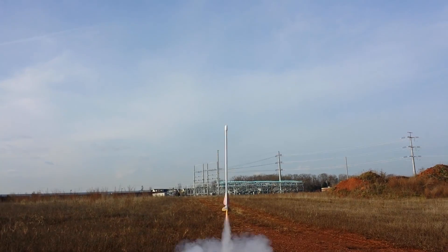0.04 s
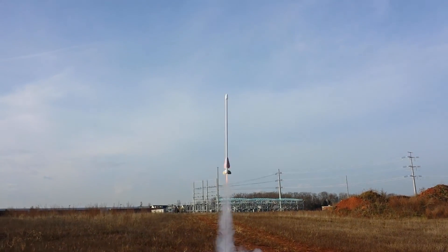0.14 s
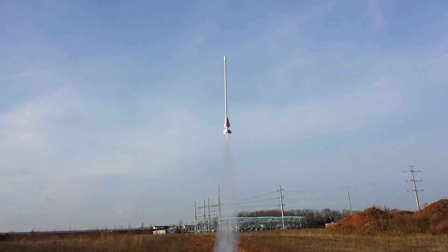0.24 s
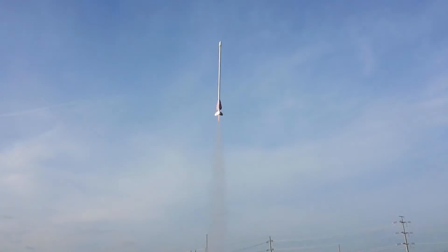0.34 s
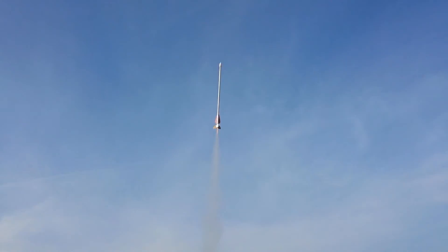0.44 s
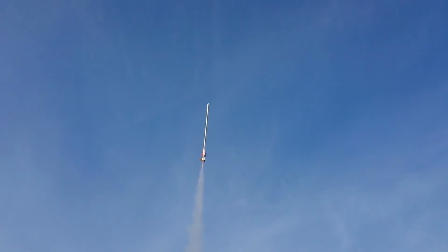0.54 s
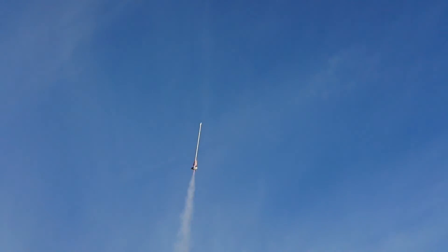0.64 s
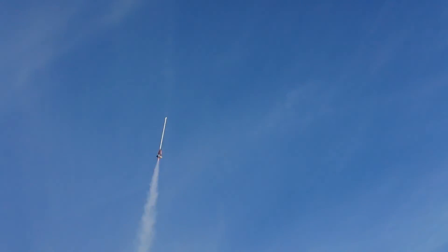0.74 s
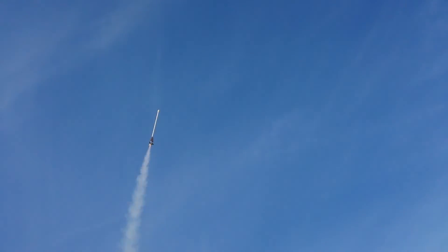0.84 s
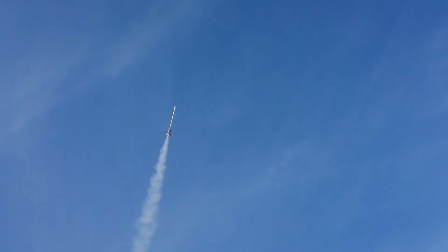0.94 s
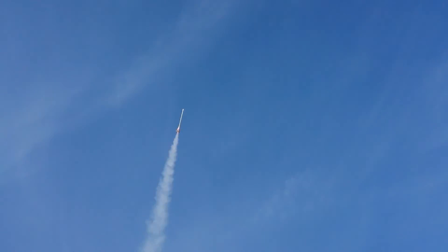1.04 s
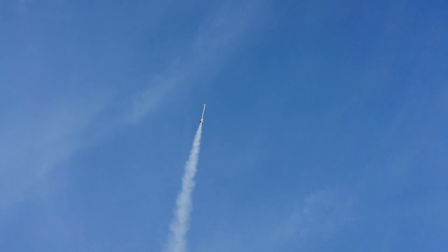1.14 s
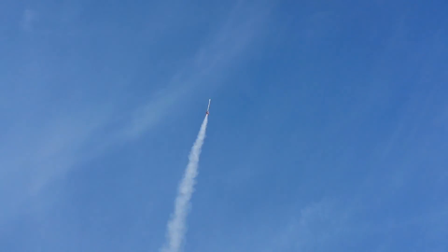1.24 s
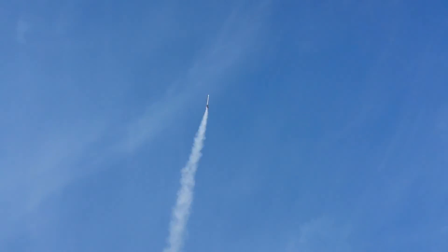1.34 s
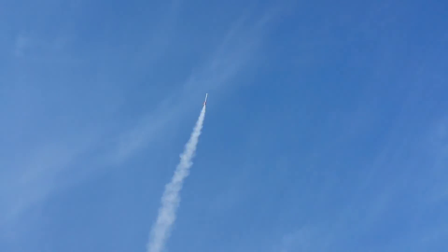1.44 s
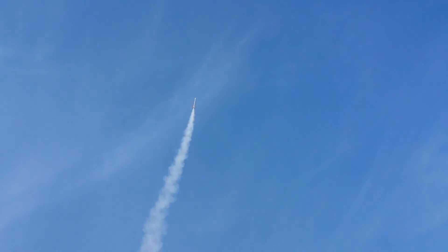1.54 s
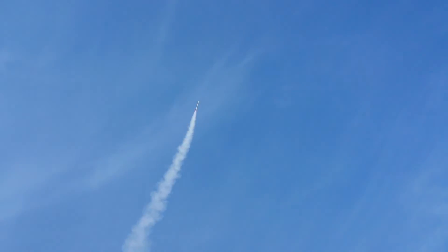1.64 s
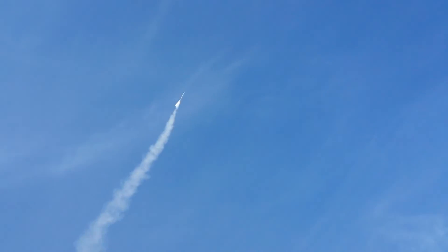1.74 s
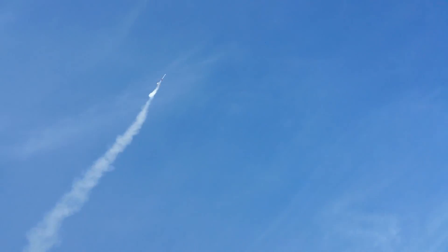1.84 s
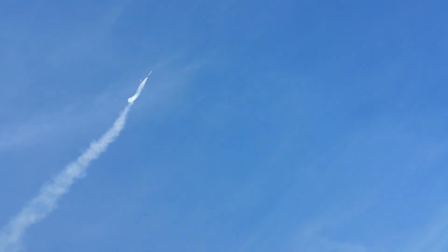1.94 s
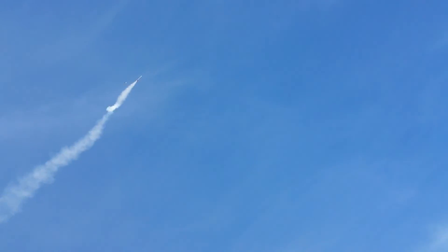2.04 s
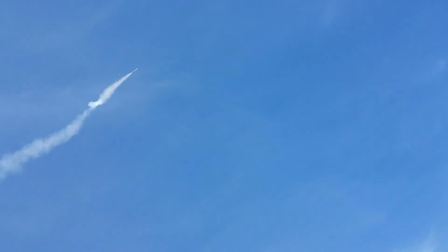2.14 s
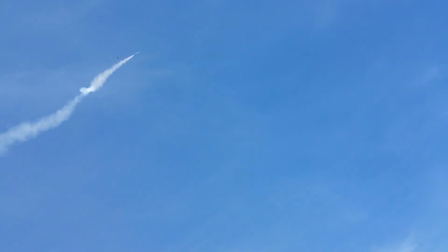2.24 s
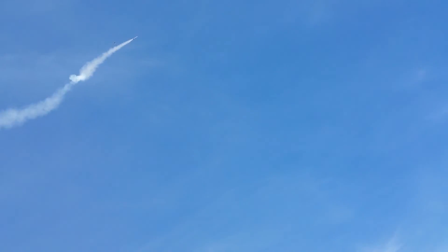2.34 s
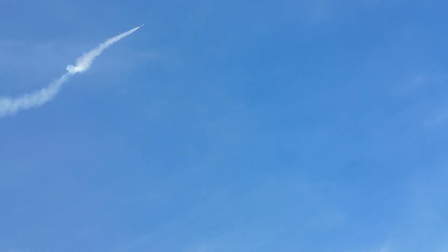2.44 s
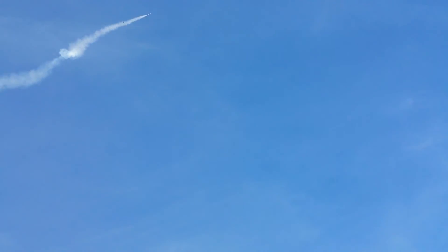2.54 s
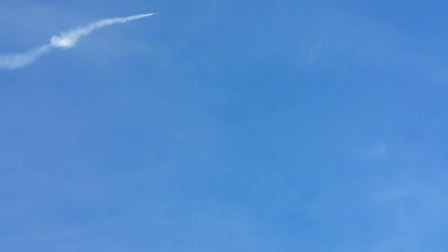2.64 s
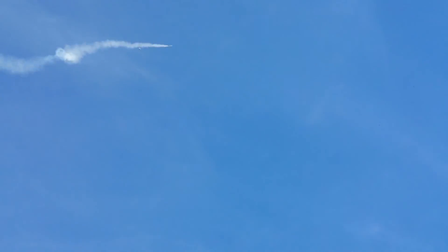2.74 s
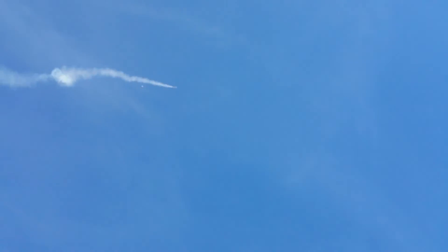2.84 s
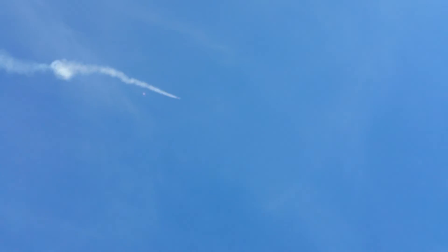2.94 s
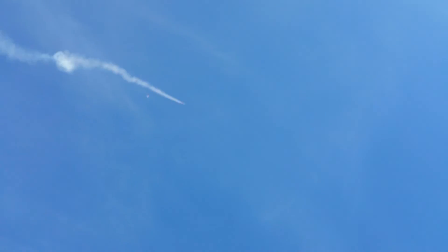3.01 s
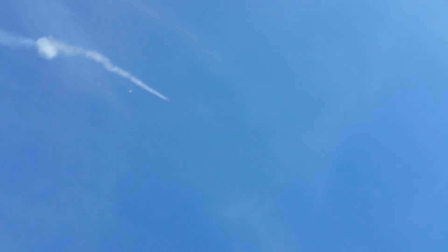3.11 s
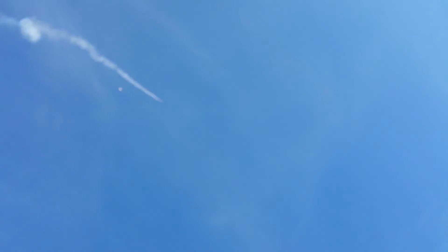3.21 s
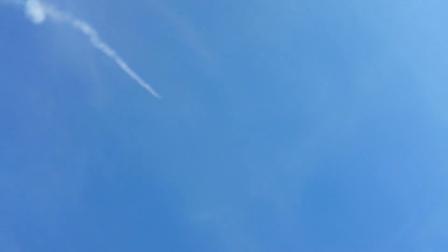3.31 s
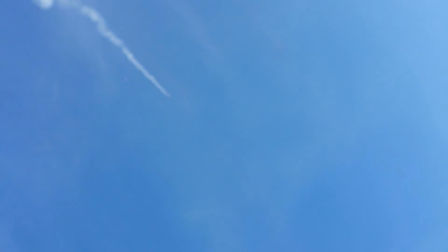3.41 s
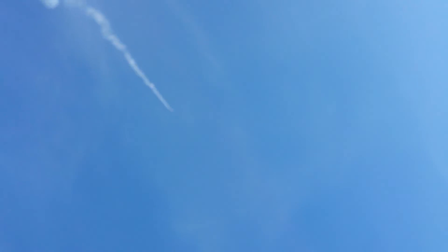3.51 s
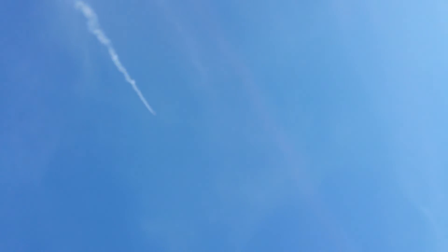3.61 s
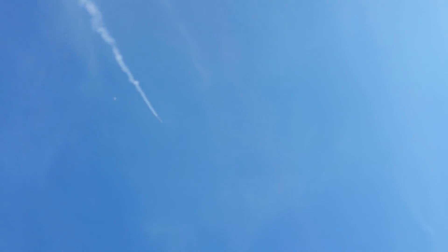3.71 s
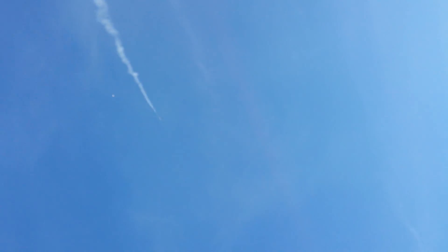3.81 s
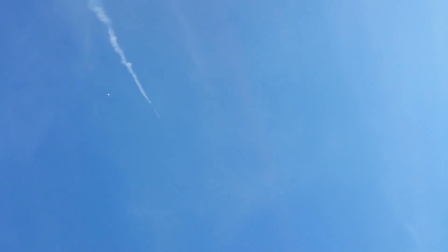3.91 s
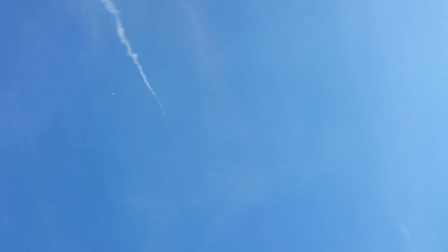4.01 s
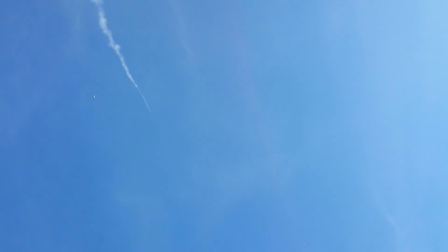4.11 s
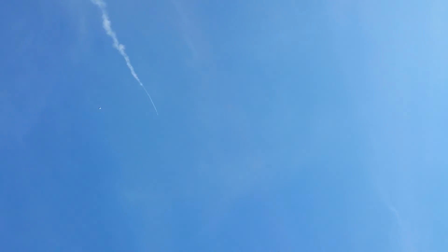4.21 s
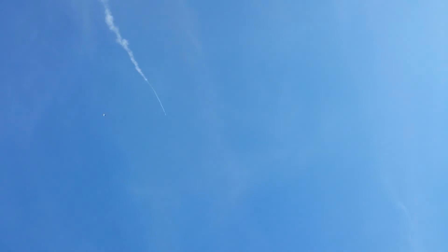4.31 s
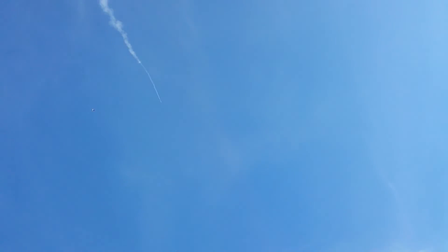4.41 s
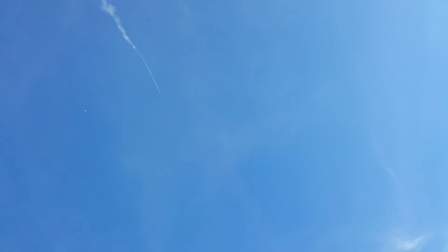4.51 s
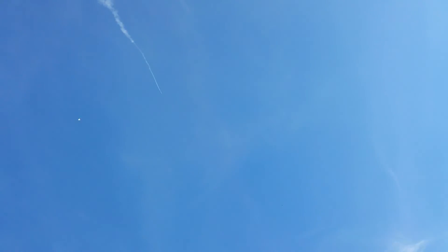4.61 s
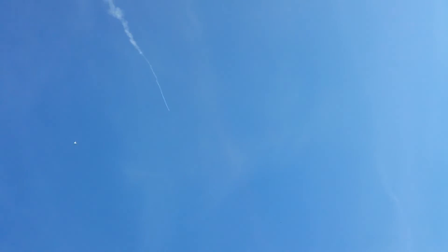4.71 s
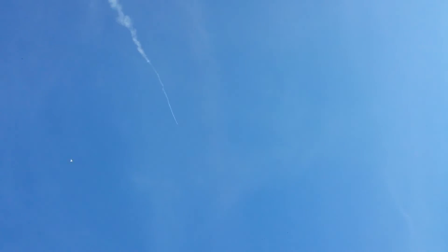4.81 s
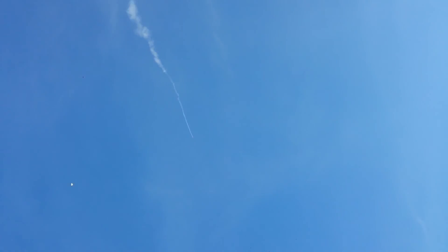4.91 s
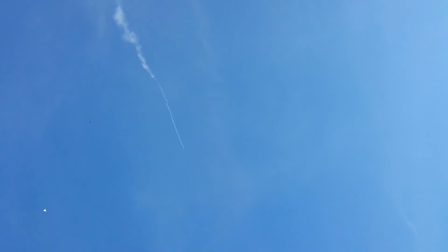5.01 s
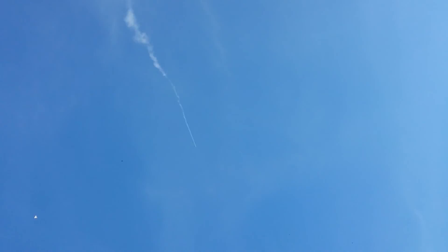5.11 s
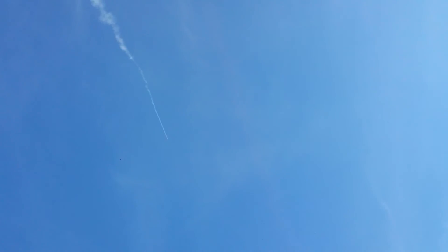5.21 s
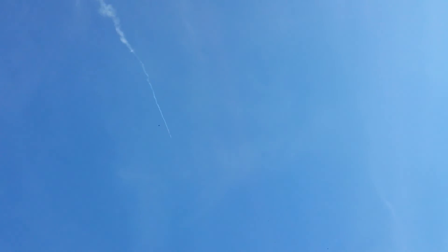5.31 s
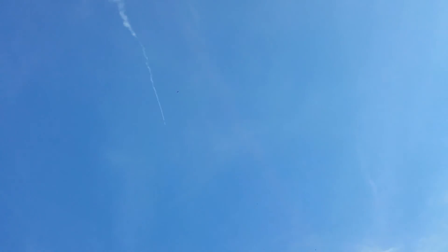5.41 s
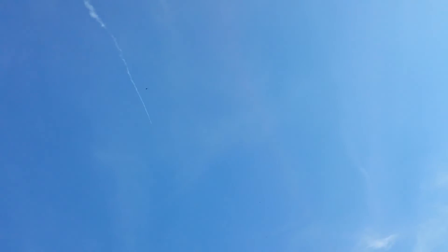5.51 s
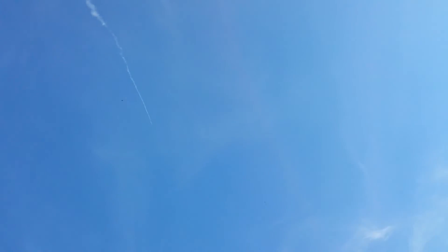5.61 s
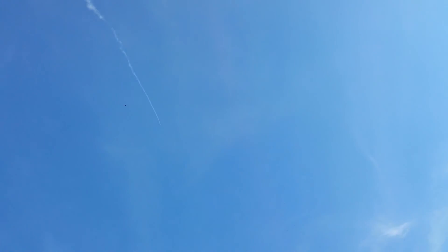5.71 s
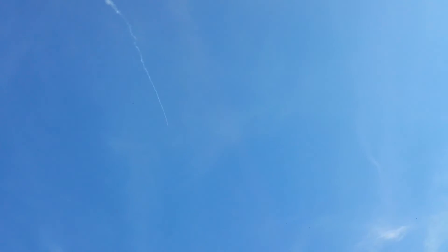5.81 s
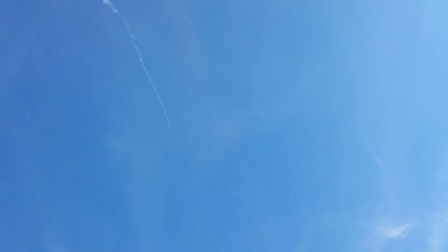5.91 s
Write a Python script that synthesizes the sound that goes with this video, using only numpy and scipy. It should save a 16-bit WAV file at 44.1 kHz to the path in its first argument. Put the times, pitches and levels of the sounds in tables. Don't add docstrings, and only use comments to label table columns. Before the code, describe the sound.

A small rocket motor ignites with a blast and loud bright hiss, cuts out briefly, then a second hiss burns and ends in faint rumble.

```python
import sys
import numpy as np
from scipy import signal
from scipy.io import wavfile
from scipy.ndimage import uniform_filter1d

SR = 44100
rng = np.random.default_rng(int(sys.argv[2]) if len(sys.argv) > 2 else 0)


def volts(x):
    e = np.asarray(x, float) / 20
    return 10 ** e


def wrap_up_sound(samples):
    columns = np.atleast_2d(samples).T
    tamed = np.clip(columns, -1, 1)
    steps = np.round(tamed * 32767).astype(np.int16)
    wavfile.write(sys.argv[1], SR, steps)


N = 262501


def evened(x):
    return x / np.sqrt(np.mean(x ** 2) + 1e-20)


def read(points, hz):
    f, value = np.transpose(points)
    return np.interp(np.log(hz + 1), np.log(f + 1), value)


def spectra(size):
    return signal.stft(rng.standard_normal((2, N)), SR, nperseg=size, noverlap=size * 3 // 4)


def pair(z, hz, same, lag_us):
    same = np.clip(same, 0, 1)[:, None]
    left = z[0] * np.exp(-2j * np.pi * hz[:, None] * lag_us / 10 ** 6)
    right = same * z[0] + np.sqrt(1 - same ** 2) * z[1]
    return np.array([left, right])


def patches(shape, bins, frames):
    x = uniform_filter1d(rng.standard_normal(shape), bins, 0)
    x = uniform_filter1d(uniform_filter1d(x, frames, 1), frames, 1)
    return evened(x)


def ring(hz, centre_hz, width, db, lag):
    resonance = 1 / (1 + 2j * (hz - centre_hz) / width) ** 2
    return 1 + (volts(db) - 1) * np.exp(-1j * lag) * resonance


def pop(hz, cycles):
    u = np.arange(0, 2.5 * cycles / hz, 1 / SR) * hz / cycles
    return -np.sin(2 * np.pi * cycles * u) * 5 * u * np.exp(-2.6 * u)


def pops(rows, left_db):
    out = np.zeros(N)
    for s, db, hz, cycles in rows:
        wavelet = volts(db) * pop(hz, cycles)
        out[round(s * SR):][:len(wavelet)] += wavelet
    return out * volts(np.array([[left_db], [-left_db]]))


# f/Hz, level/dB per Hz
FIELD_SPECTRUM = [(12, -67), (20, -33.5), (43, -7), (92, -1.5), (263, -10), (294, -13), (421, -21),
                  (713, -14.5), (1270, -15), (1550, -18.5), (3010, -33.5), (6530, -35), (11400, -45.5),
                  (13800, -45.5), (15000, -53.5)]
# f/Hz, coherence/1
FIELD_COHERENCE = [(30, .75), (150, 1), (500, 0.39), (1500, 0.67), (3000, 0.396), (6000, 0.19),
                   (15000, 0.018)]
# t/s, level/dB
FIELD_GAIN = [(.2, -53.5), (.7, -51.5), (1.06, -61.5), (2.0, -59), (4.2, -40), (4.45, -41), (5.95, -41)]


def field():
    lag_us, whine_hz = -415, 14002
    hz, t, z = spectra(size=2048)
    db = read(FIELD_SPECTRUM, hz)[:, None] + 1.9 * patches(z[0].shape, bins=5, frames=5)
    z = pair(z, hz, read(FIELD_COHERENCE, hz), lag_us) * volts(db)
    z[0] *= volts(.6) * ring(hz[:, None], 6400, 1800, 2.0, lag=.6)
    z *= ring(hz[:, None], 296, 50, 3.0, lag=0)
    out = evened(signal.istft(z, SR, nperseg=2048, noverlap=1536)[1][:, :N])
    time = np.arange(N) / SR
    fade_in = np.clip((time - 4.1) / .3, 0, 1)
    out[1] += volts(-25) * fade_in * np.sin(2 * np.pi * whine_hz * time)
    return out * volts(np.interp(time, *np.transpose(FIELD_GAIN)) + 4.0)


# t/s, length/s, level/dB, low f/Hz, high f/Hz
RUSHES = [
    (.03, .115, -26.5, 120, 790),
    (5.275, .055, -41, 685, 1570),
    (5.27, 0.066, -54, 2500, 9000),
]


def rushes():
    out = np.zeros((2, N))
    for s, length, db, low_hz, high_hz in RUSHES:
        a, b, lumps = rng.standard_normal((3, SR // 4))[:, :round(length * SR)]
        band = signal.butter(2, [low_hz, high_hz], "band", fs=SR)
        noise = signal.lfilter(*band, [a, .6 * a + .8 * b])
        grain = volts(1.5 * evened(uniform_filter1d(lumps, 150)))
        rush = volts(db) * evened(noise * grain) * signal.windows.tukey(len(a), .4)
        out[:, round(s * SR):][:, :len(a)] += rush
    return out


# t/s, peak level/dB, f/Hz, cycles/1
HANDLING = [
    (3.9325, -8.5, 1250, 1.4),
    (4.073, -20.5, 1430, 1.3),
    (4.183, -25, 1210, 1.1),
    (5.291, -28.5, 743, 4),
]


def handling():
    return pops(HANDLING, 0.63)


def height(t):
    return 1.02 * t + .46 * t ** 3


USUAL_ROAR_DB, USUAL_FIZZ_DB = -10, -1
FLARE_S = .12
# t/s, jet level/dB
THRUST_CURVES = [
    [(0, -33.5), (.048, -20.5), (.104, -18.5), (.27, -24.5), (.5, -22.5), (.83, -22.5), (.96, -24.5),
     (1.38, -25.5), (1.785, -28)],
    [(1.95, -56.5), (1.99, -41.5), (2.04, -27.5), (2.14, -27.5), (2.4, -30.5), (3.26, -31), (3.57, -27),
     (3.73, -27.5), (3.93, -24.5)],
]
# cut-off/(dB/s), echo below last level/dB, echo decay/(dB/s), fizz/dB, echo fizz loss/(dB/s)
MOTOR_ENDINGS = [
    (520, -16, 123, 4, -61.5),
    (210, -19.5, 27.5, 5, 2),
]
# t/s, half length/s, level/dB, low roar/dB
JET_SWELLS = [(0, .02, -6, 25), (0.258, .1, -2.5, 5), (0.876, .04, 0.5, -3.5), (1.28, .04, -1, 2.5),
              (1.574, .22, -.5, 3.5), (1.794, .015, -0.5, 10), (2.109, 0.045, 0, 5.5),
              (2.17, 0.043, 0.5, 6.5), (2.833, .02, 3, 0.5), (3.225, .03, 0, 3.5), (3.565, .06, 1, -3),
              (3.866, .02, 1, -0.5), (3.975, .03, -0.5, 8.5), (4.36, .1, -3, 4), (1.92, .04, 1, 6),
              (4.455, 0.054, 3.5, -6), (1.387, .04, -0.5, 4.5), (3.085, .04, 2, -1.5), (3.671, .04, 1, 0),
              (2.352, .08, 1.5, -1.5)]


def burn(t):
    power, fizz = 0, 0
    for curve, (cut, echo_db, decay, motor_fizz_db, dulling) in zip(THRUST_CURVES, MOTOR_ENDINGS):
        s, db = np.transpose(curve)
        after = np.maximum(t - s[-1], 0)
        now_db = np.interp(t, s, db, left=-150)
        direct = volts(2 * (now_db - cut * after))
        echo = (after > 0) * volts(2 * (now_db + echo_db - decay * after))
        part = direct + echo
        power = power + part
        fizz = fizz + part * (motor_fizz_db - dulling * after)
    s, half, swell_db, roar_db = np.transpose(JET_SWELLS)[:, :, None]
    bump = np.exp(-((t - s) / half) ** 2)
    level_db = 10 * np.log10(power) + (swell_db * bump).sum(0)
    far_db = 7 * np.log10(np.hypot(1, height(t)))
    fizz_db = fizz / power - far_db + 11.5 * np.exp(-t / FLARE_S)
    return level_db, USUAL_ROAR_DB + (roar_db * bump).sum(0), fizz_db


# t/s, peak level/dB, cycles/1
BLAST_SLAMS = [
    [(.0695, -8, .6), (.103, -13, .5), (.1172, -7, .6)],
    [(.0678, -10, .55), (.0855, -12.5, .6), (.1172, -15.5, .5)],
]


def slams():
    rows = [[(s, db, 170, cycles) for s, db, cycles in port] for port in BLAST_SLAMS]
    return np.array([-pops(port, 0)[0] for port in rows])


def crackle():
    level_db, roar_db = burn(np.arange(N) / SR)[:2]
    drive = volts(level_db + roar_db - 6.5)
    strength = volts(3.3 * np.minimum(rng.exponential(1, N), 4))
    size = strength * (rng.random(N) < 150 / SR) * drive
    kind = rng.integers(0, 4, N)
    out = np.zeros(N)
    for k in range(4):
        out += signal.oaconvolve(size * (kind == k), pop(450 * 1.58 ** k, 1.0))[:N]
    return out * volts(np.array([[1.], [-1.]]))


# t/s, peak level/dB
MOTOR_SPITS = [(0.789, -16.5), (0.804, -20), (0.975, -22.5), (1.101, -26.5), (1.259, -32), (1.4, -23),
               (1.673, -23.5), (1.708, -20.5), (1.783, -34), (1.799, -25), (2.711, -32), (2.84, -30),
               (3.075, -25.5), (3.318, -28), (3.595, -18)]
# t/s, peak level/dB, f/Hz, cycles/1
PITCHED_SPIT = [
    (1.363, -16.5, 640, .7),
]


def spits():
    small = [(s, db, 523, .6) for s, db in MOTOR_SPITS]
    pulses = crackle() + pops(small + list(PITCHED_SPIT), 0.4)
    return signal.lfilter(*signal.butter(2, 90, "high", fs=SR), pulses)


# f/Hz, level/dB
JET_SPECTRUM = [(60, -37.5), (300, -25.5), (700, -13), (1400, -9), (2300, -2.5), (4000, 2), (5500, 1.5),
                (7000, 2), (8400, 4.5), (10000, -1), (12000, -9), (14000, -18.5), (15400, -27)]
# f/Hz, coherence/1
JET_COHERENCE = [(100, .5), (800, .88), (2500, .9), (4500, .84), (7000, .78), (9200, .84), (12000, .78),
                 (15000, .6)]
# t/s, lag of left behind right/us, upper ring level/dB
CAMERA_AIM = [(0, -10, 2), (.1, -16.5, -13), (.2, 4, -1.5), (0.401, 9.5, 0.5), (.5, -7.5, 9),
              (.6, 26.5, 14), (.8, 58, 8), (1, 79.5, -3), (1.3, 7.5, -5), (1.4, 13.5, -11.5),
              (1.7, 31.5, -2), (2.0, 80.5, 4), (2.2, 98, 6), (2.7, 87, 6), (3.1, 45.5, -2), (3.2, 79, 6),
              (3.55, 56, 5.5), (3.75, 77.5, 3)]
# t/s, ring level/dB, f/Hz, phase lag/rad
PORT_CAVITY = [(0, 6.5, 6370, 0.13), (1.05, 12, 6410, 1.5), (2.1, 9.5, 6230, 0.11), (2.65, 12, 6870, 0.53),
               (4.2, 13, 6600, 0.55)]
# f/Hz, level/dB
LEFT_RESPONSE = [(300, -2.5), (1200, 2), (3000, 2), (5000, 0), (9000, -2.5), (13000, 0.5)]
# f/Hz, width/Hz, level/dB, phase lag/rad
BODY_RESONANCE = (1824, 1400, 4.72, 1.7)


def jet():
    hz, t, z = spectra(size=256)
    f = hz[:, None]
    level_db, roar_db, fizz_db = burn(t)
    turn, *aim = np.transpose(CAMERA_AIM)
    lag_us, upper_db = (np.interp(t, turn, c) for c in aim)
    tip, *cavity = np.transpose(PORT_CAVITY)
    ring_db, ring_hz, lag = (np.interp(t, tip, c) for c in cavity)
    ring_db = ring_db + 0.16 * upper_db + 16.5 * np.exp(-t / FLARE_S)
    fizz_db = fizz_db + 0.25 * upper_db

    low_share = 1 / (1 + (f / 2300) ** 5.0)
    high_share = np.minimum((f / 10500) ** 2.5, 1.6)
    db = read(JET_SPECTRUM, f) + level_db + 10.5
    db += low_share * (roar_db - USUAL_ROAR_DB) + high_share * (fizz_db - USUAL_FIZZ_DB)
    db += 0.96 * patches(db.shape, bins=7, frames=18)
    db += 0.69 * patches((1, len(t)), bins=1, frames=30)
    db += 0.88 * patches(db.shape, bins=40, frames=2)

    z = pair(z, hz, read(JET_COHERENCE, hz), lag_us) * volts(db)
    body_hz, body_width, body_db, body_lag = BODY_RESONANCE
    upper_hz = 8660 - 69 * upper_db
    z[0] *= ring(f, ring_hz, 1605, ring_db, lag) * volts(read(LEFT_RESPONSE, f))
    z[0] *= ring(f, upper_hz, 2400, upper_db, lag=0.1)
    z[0] *= ring(f, body_hz, body_width, body_db + 0.009 * lag_us, body_lag + 0.0059 * lag_us)
    return signal.istft(z, SR, nperseg=256, noverlap=192)[1][:, :N]


def ground(x):
    dull = signal.lfilter(*signal.butter(1, 3500, fs=SR), x)
    up = height(np.arange(N) / SR) + .025
    late = 11.87 * up / np.hypot(1, up) * SR / 1000
    echo = [np.interp(np.arange(N) - late * factor, np.arange(N), v) for v, factor in zip(dull, (1, 1.015))]
    return x + volts(-6) * np.array(echo)


def scene():
    background = field() + rushes() + handling()
    rocket = ground(jet() + spits())
    return background + slams() + rocket


def top_cut(x):
    return signal.sosfilt(signal.butter(12, 15340, fs=SR, output="sos"), x)


def record(dry):
    thin = signal.lfilter(*signal.butter(2, 40, "high", fs=SR), dry)
    mix = np.clip(1.4 * np.tanh(thin / 1.4), -1, 1)
    return top_cut(mix)


dry = scene()
out = record(dry)
wrap_up_sound(out)
```